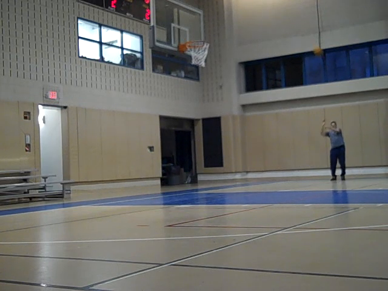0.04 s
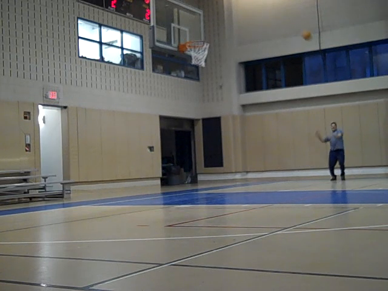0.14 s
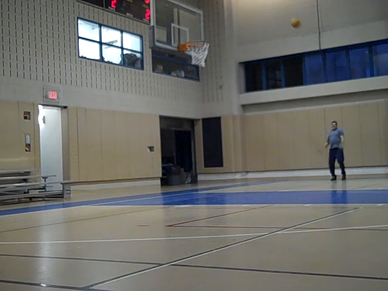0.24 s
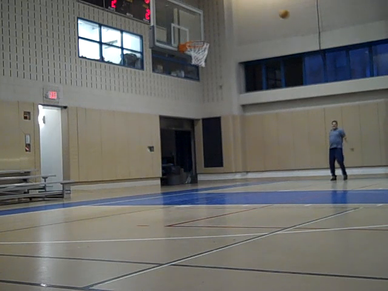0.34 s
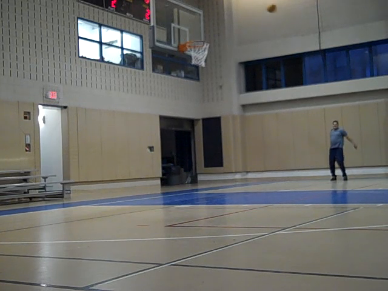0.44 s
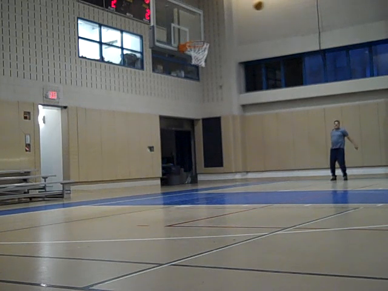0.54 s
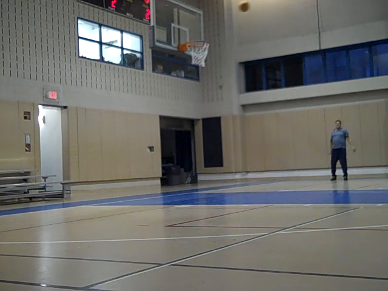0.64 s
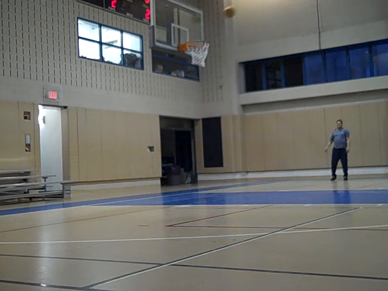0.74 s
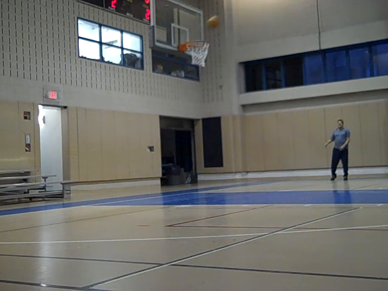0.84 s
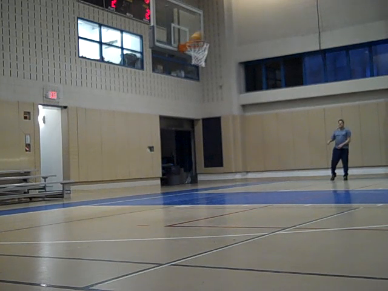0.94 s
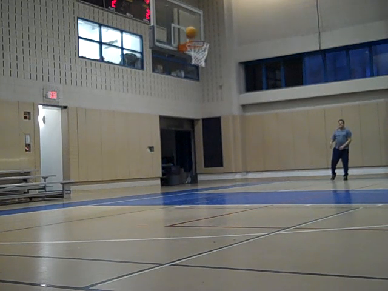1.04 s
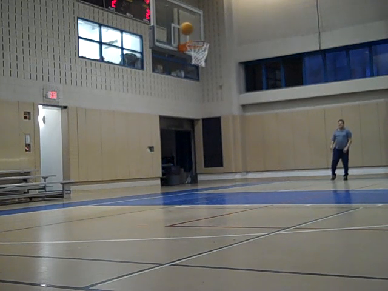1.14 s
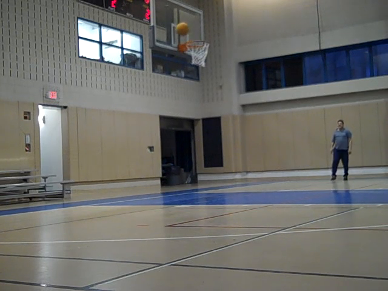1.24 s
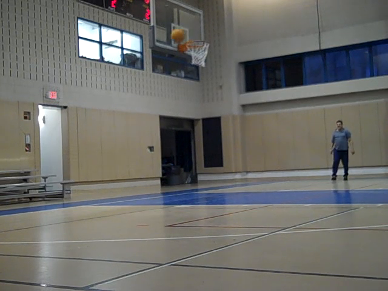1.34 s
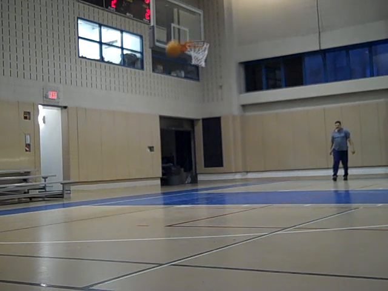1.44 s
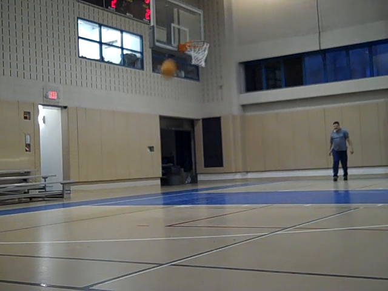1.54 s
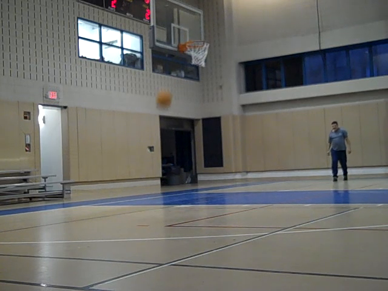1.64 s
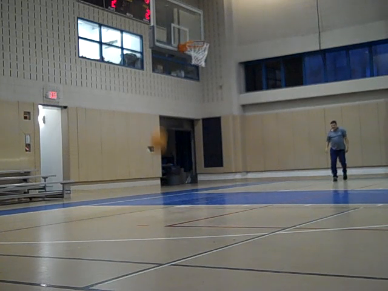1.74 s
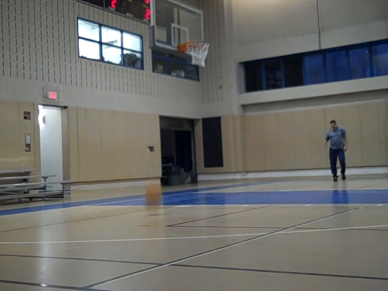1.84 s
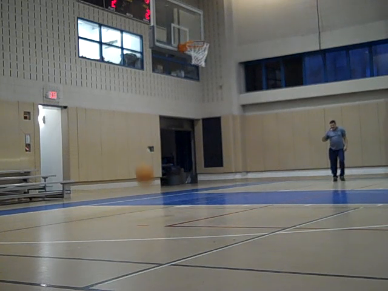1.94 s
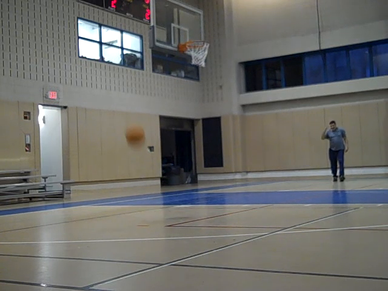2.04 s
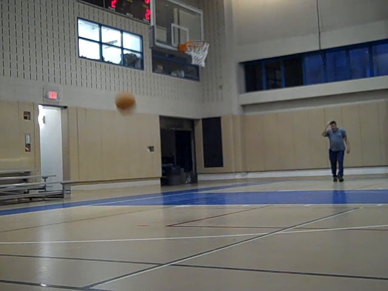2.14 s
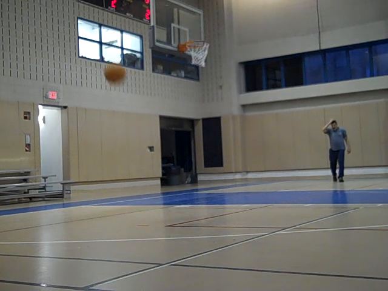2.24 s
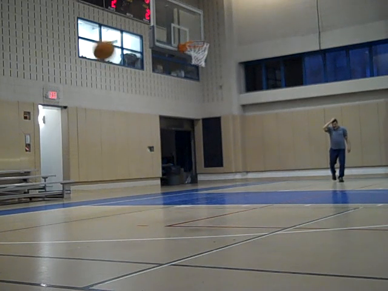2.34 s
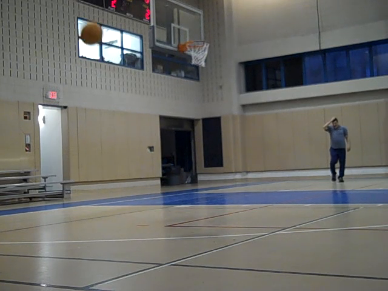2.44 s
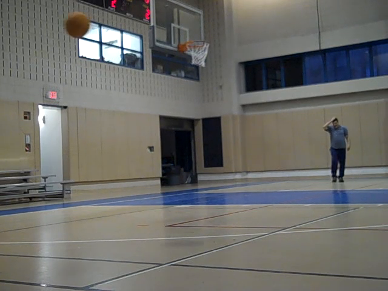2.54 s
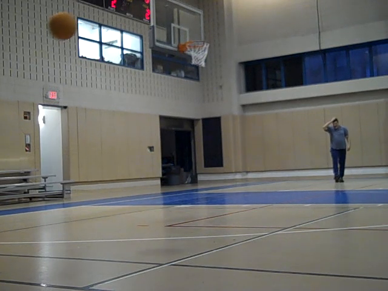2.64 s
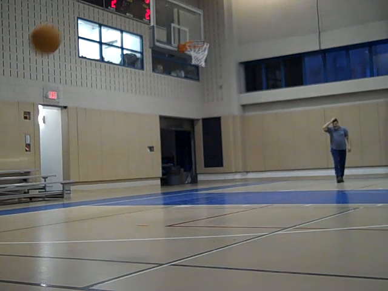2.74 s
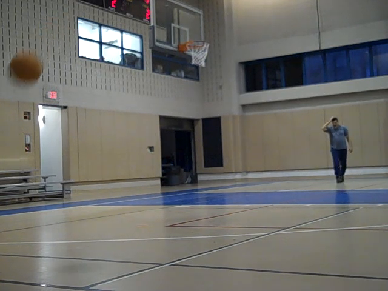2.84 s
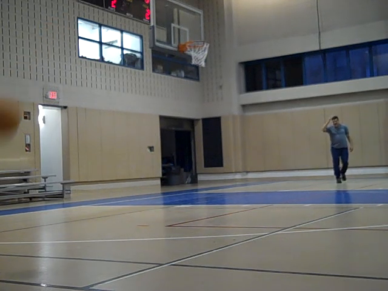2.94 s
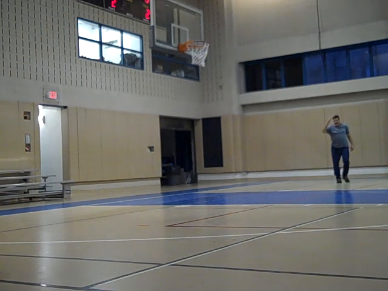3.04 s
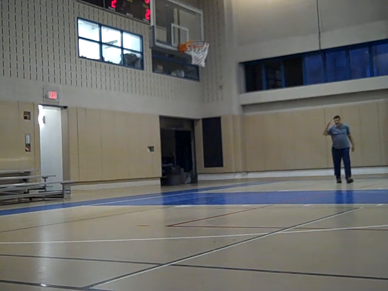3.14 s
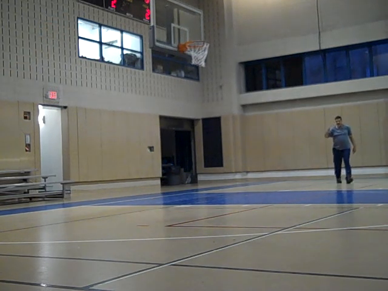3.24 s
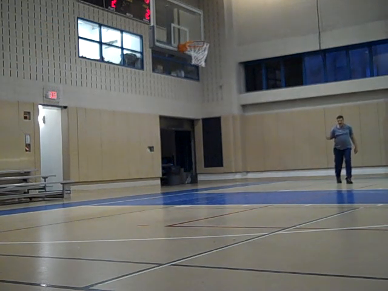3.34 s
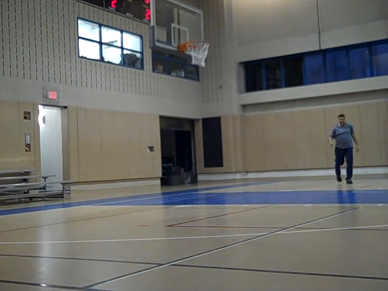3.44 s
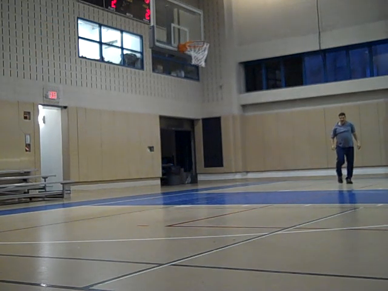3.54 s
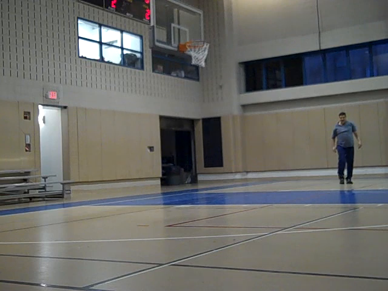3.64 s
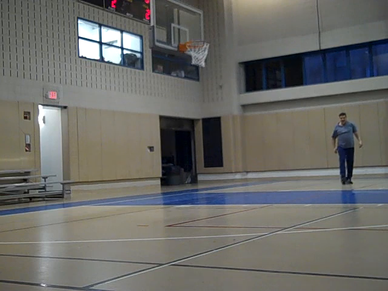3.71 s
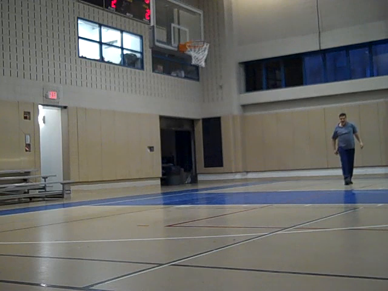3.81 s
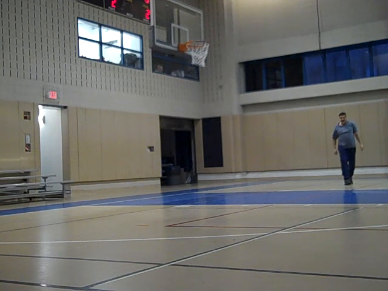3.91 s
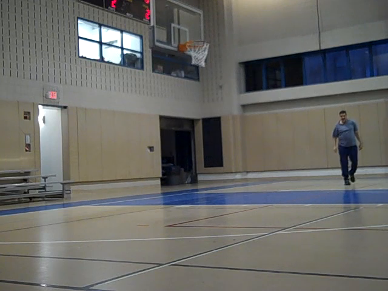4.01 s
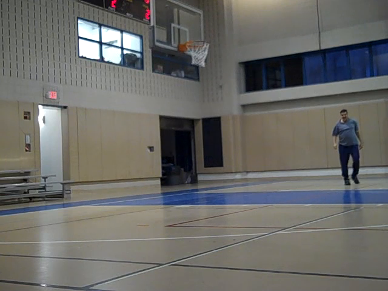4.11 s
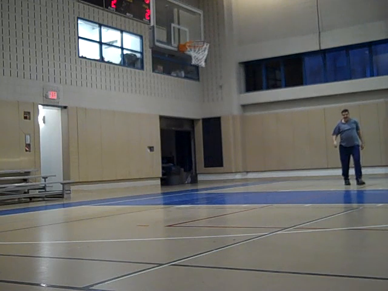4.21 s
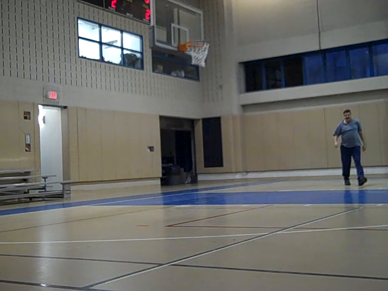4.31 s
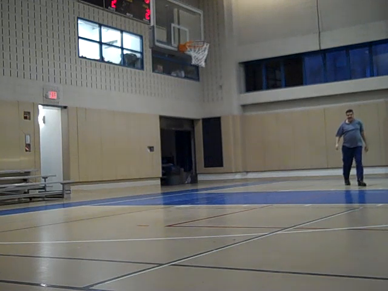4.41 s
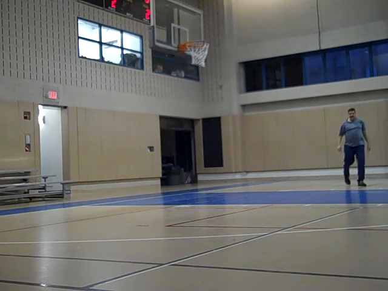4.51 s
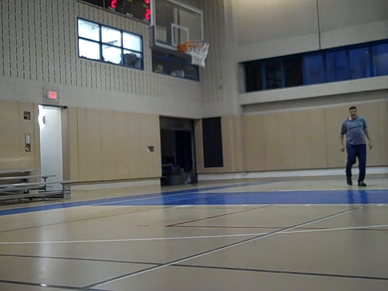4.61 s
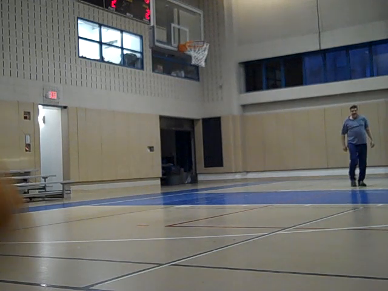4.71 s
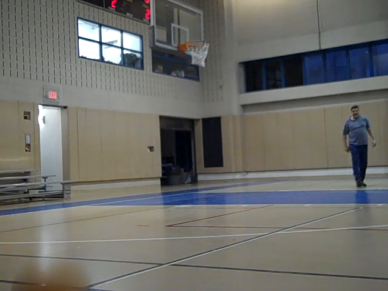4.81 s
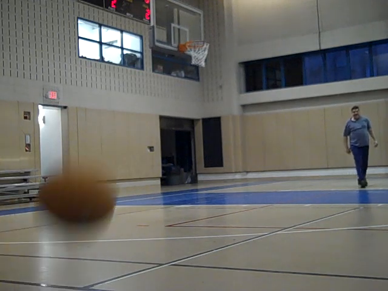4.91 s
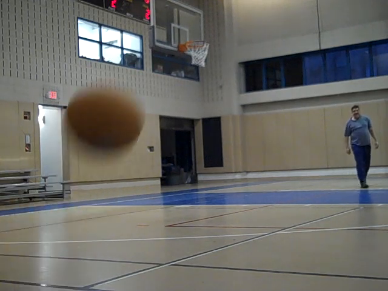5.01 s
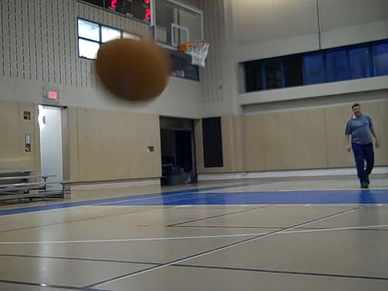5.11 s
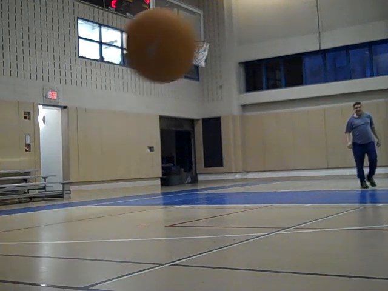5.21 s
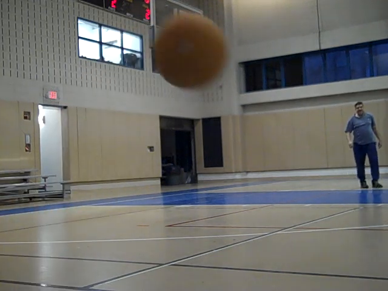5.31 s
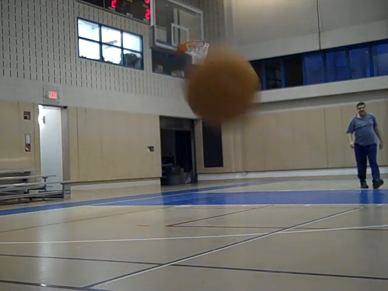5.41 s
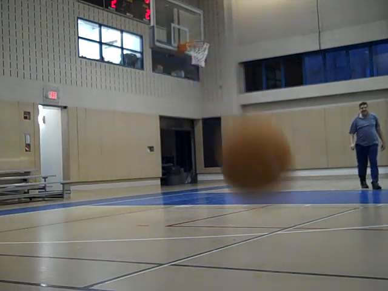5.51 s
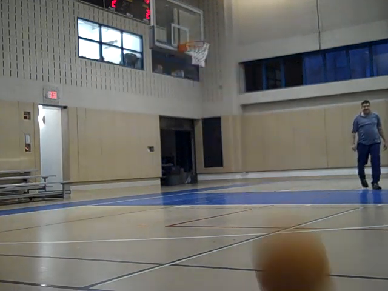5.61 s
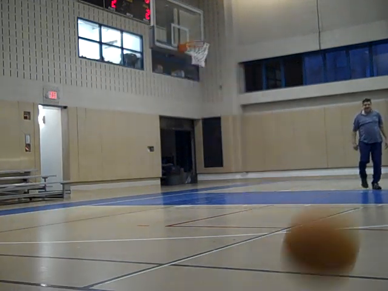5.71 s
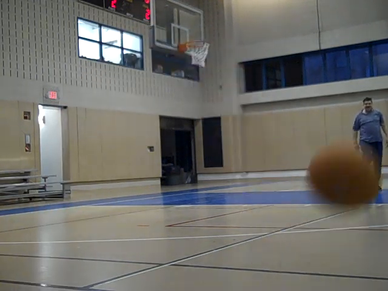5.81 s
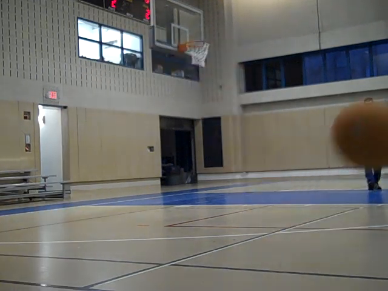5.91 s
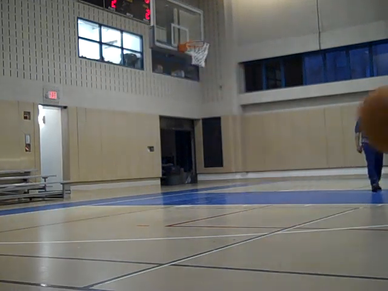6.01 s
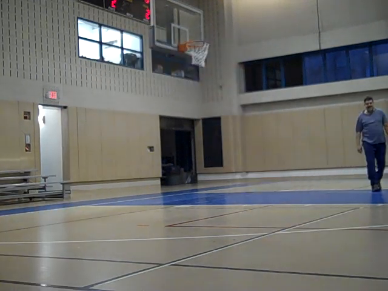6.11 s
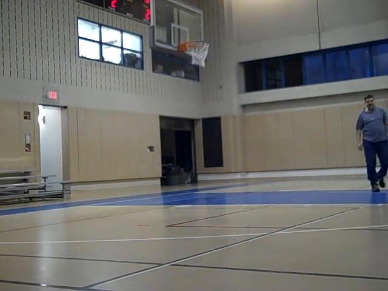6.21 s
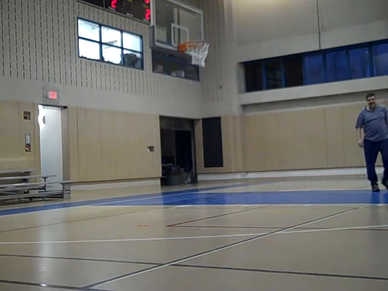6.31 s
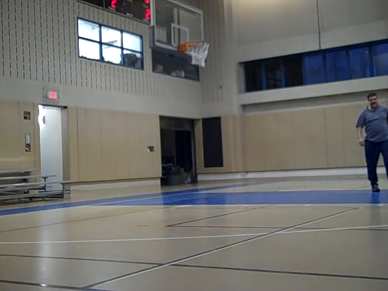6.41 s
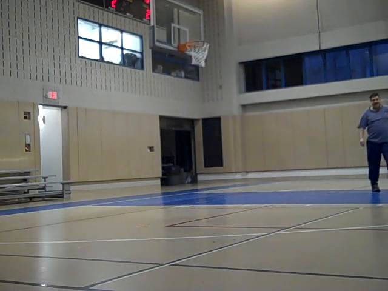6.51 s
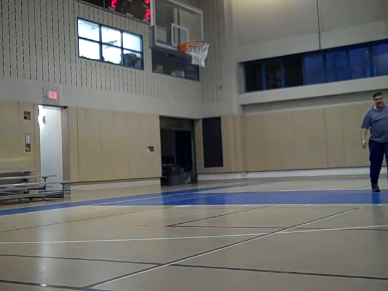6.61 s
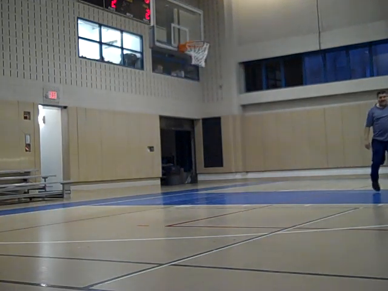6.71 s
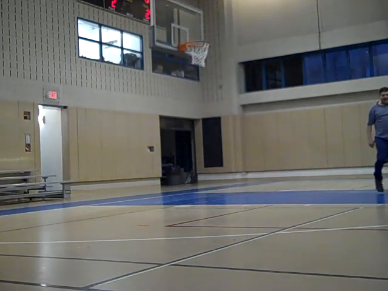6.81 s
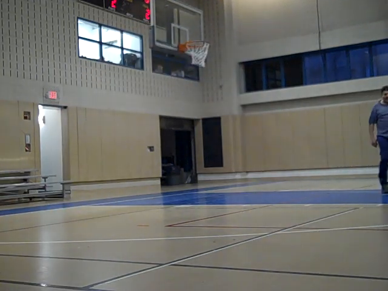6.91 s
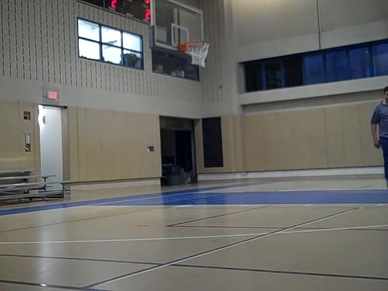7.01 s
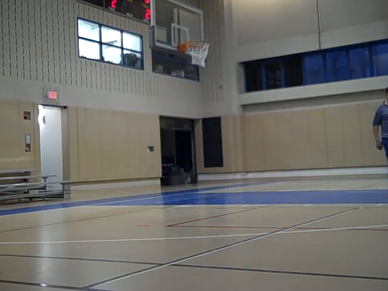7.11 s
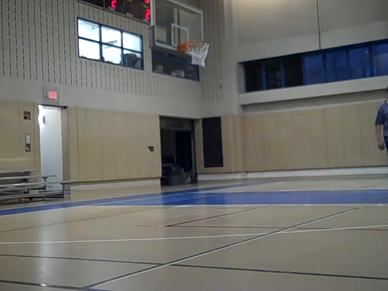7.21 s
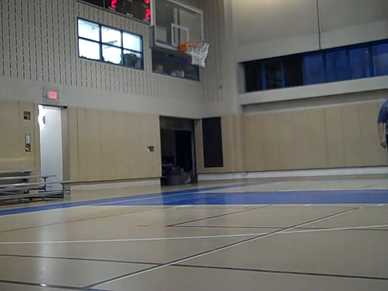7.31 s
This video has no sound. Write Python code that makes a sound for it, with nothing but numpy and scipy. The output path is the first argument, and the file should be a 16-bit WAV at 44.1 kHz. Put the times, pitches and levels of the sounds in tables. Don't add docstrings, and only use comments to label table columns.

```python
import sys
import numpy as np
from scipy import signal
from scipy.fft import rfft, irfft
from scipy.io import wavfile
from scipy.ndimage import uniform_filter1d

SR = 44100
rng = np.random.default_rng(int(sys.argv[2]) if len(sys.argv) > 2 else 0)


def volts_from_db(level):
    exponent = np.asarray(level, float) / 20
    return 10 ** exponent


def store_pcm(level_fs):
    pcm = np.round(np.clip(level_fs, -1, 1) * 32767).astype(np.int16)
    wavfile.write(sys.argv[1], SR, np.atleast_2d(pcm).T)


N = 324135

# [f/Hz, density/dB]
VENT_COLOUR = [(22, -8), (58, -3), (251, -4), (1080, -10.5), (2730, -19), (6710, -26), (15200, -44),
               (16500, -56)]
# [f/Hz, level/dB]
WHINES = [(4802, -93), (6481, -88)]

# [kind of contact, t/s, slap level/dB, ring level/dB, tail level/dB, #
# tail centre f/Hz]
BLOWS = [
    ("hand", 0.0263, -47, -51, -59, 1200),
    ("rim", 1.0086, -36.5, -29, -51.5, 1250),
    ("far floor", 1.932, -11.5, -19.5, -33.5, 956),
    ("floor", 3.1637, -11, -23.5, -41.5, 1340),
    ("stands", 4.0155, -25, -30.5, -40, 630),
    ("floor", 4.849, -12, -21.5, -44, 1750),
    ("floor", 5.7015, -12.5, -24, -48.5, 1630),
    ("floor", 6.4133, -16.5, -28, -51.5, 1420),
    ("floor", 7.024, -18, -34, -52.5, 1440),
]
# [distance/m, side wall detour/m, end wall detour/m, echo level/dB, tail treble/(dB/octave)]
PLACES = [
    (21.5, 10.3, 13.4, -3, -4.5),
    (18, 15.6, 25, -8, .6),
    (16.7, 14.1, 35.3, -4.5, .7),
    (8, 36.8, 69.8, -14.5, 2.2),
    (4, 36, 70, -40, -5.5),
    (2.9, 40.1, 66.9, -22, 1.2),
    (1.85, 43.2, 67, -21, 2.8),
    (1.95, 40.1, 70.9, -20.5, 4.4),
    (2.2, 11.3, 32, -16.5, 3.4),
]
CONTACT = {"hand": (-4, -22, .0018, -2.5, 2), "rim": (-6, -19, 1, 2.2, 3),
           "far floor": (-18, -27, -0.2, 0, 0), "floor": (1, -26.5, .003, .6, 0),
           "stands": (6, -21.5, 0.1, 3, 0)}
REPLY = {"hand": (-2.2, 7, 2.5, .022), "rim": (1.5, -3, -.6, .1), "far floor": (-1.1, 5.5, -2.5, .2),
         "floor": (.1, 4, -4.5, .097), "stands": (3.5, -13.5, -8, .028)}
# [f/Hz, density/dB]
SKIN_COLOUR = [(180, -17), (300, 0.5), (1530, -6), (2030, -2), (7000, -9.5), (8730, -6), (14000, -19.5),
               (16500, -27)]
# [f/Hz, level/dB, t60/s]
BALL_MODES = [(983, -0.5, 0.036), (1196, 4, 0.02), (1470, -1, 0.026), (1858, -5, 0.043), (2348, -11, 0.056),
              (2725, -15, 0.036), (2950, -12.5, 0.07), (3470, -11.5, 0.03), (4270, -28, 0.16)]
# [f/Hz, level/dB, t60/s]
FLOOR_MODES = [(75.6, -0.5, 0.12), (100.3, 7.5, 0.17), (178, -6, 0.04), (300, 4, 0.18)]
# [f/Hz, colour/dB, t60/s]
HALL_BANDS = [(40, -22.5, 1.0), (94, -5.5, 1.96), (378, -3, 1.09), (1000, -2, 1.727), (1960, -4, 1.72),
              (4000, -8.5, 1.02), (9000, -15.5, 0.7), (16000, -38, 0.52)]

# [t/s, level/dB]
LANDING = [
    (.21, -78),
    (.245, -52),
    (.33, -59.5),
    (.42, -58.5),
    (.5, -66),
]
# [t/s, level/dB]
SLIDING = [
    (.3, -74),
    (.42, -63),
    (.6, -59),
    (.75, -63.5),
    (.9, -68),
    (1.0, -69),
]
# [f/Hz, width/Hz, level/dB]
LANDING_PEAKS = [(1300, 900, -9), (1480, 120, -5), (1850, 110, 4), (3880, 450, -19), (5700, 900, -23)]
SLIDING_PEAKS = [(1450, 700, -5), (1980, 260, 0), (2280, 300, -4), (2510, 110, 0), (3800, 500, -20),
                 (4620, 600, -20)]
# [t/s, level/dB,
# centre f/Hz, width/Hz, length/s]
TICKS = [(0.211, -55.5, 796, 200, 0.067), (.24, -60, 1210, 180, 0.061), (0.222, -64.5, 10200, 2500, 0.036),
         (0.483, -64.5, 9000, 8200, 0.045), (1.94, -22.5, 990, 300, 0.0054), (2.67, -66, 9000, 8000, 0.012),
         (2.7542, -67, 5800, 3000, .004), (3.753, -63, 8000, 8000, .005), (3.78, -66, 10000, 6000, 0.0055),
         (3.8423, -62.5, 5000, 5000, 0.0091), (3.876, -56.5, 1500, 1000, 0.022),
         (4.313, -63, 11000, 7000, 0.011), (4.5147, -66, 5000, 4000, .004),
         (5.414, -66.5, 10000, 8000, 0.02), (5.608, -57, 4480, 4000, 0.0021),
         (6.764, -48, 700, 300, 0.0083)]

# [t/s, level/dB, overtone level/dB, length/s]
SQUEAKS = [(1.154, -48, -10, 0.065), (1.2094, -52.5, -3, 0.019), (1.276, -44.5, -5.5, 0.022),
           (1.3294, -65.5, 8.5, 0.02), (1.427, -59, 7, 0.038), (1.467, -56, 0, 0.042),
           (1.5647, -52.5, -3, 0.042), (1.621, -71, 4, 0.037), (1.707, -64.5, -6, 0.04),
           (1.796, -55.5, -3, 0.028), (1.874, -72, -6, 0.034)]
# [multiple of the fundamental, level/dB]
HINGE_OVERTONES = [(2, -10), (3, -10), (4, -32), (5, -22), (6, -25), (7, -27)]

# [f/Hz, level/dB, t60/s]
PLANK_MODES = [(113, -35, 0.28), (211, -6, 0.98), (289, 2.5, 0.86), (340, -6.5, 1.26), (422.6, -4.5, 1.21),
               (502, 5, 0.49), (558, -8, 0.65), (640, 4, 0.31), (770, -26, 0.68), (808, -9.5, 1.25),
               (1030, -10, 1.1), (1210, -13, 0.21), (1290, 0.5, 0.45), (1740, -24, 0.34)]


def level(x, db):
    return x * volts_from_db(db) / np.sqrt(np.mean(x ** 2))


def peak(x, db):
    return x * volts_from_db(db) / np.abs(x).max()


def noise(length):
    return rng.standard_normal(length)


def clock(seconds):
    return np.arange(int(seconds * SR)) / SR


def colour(x, points):
    hz, db = np.transpose(points)[:2]
    f = np.fft.rfftfreq(len(x), 1 / SR) + 1
    gain = volts_from_db(np.interp(np.log(f), np.log(hz), db))
    return irfft(rfft(x) * gain, len(x))


def resonate(x, hz, width, db):
    b, a = signal.iirpeak(hz, hz / width, SR)
    return volts_from_db(db) * signal.lfilter(b, a, x)


def steep(x, hz, width, db):
    return resonate(resonate(x, hz, width, db), hz, width, 0)


def decay(t, t60):
    return 1000. ** (-t / t60)


def ring(modes, seconds):
    t = clock(seconds)
    return sum(volts_from_db(db) * np.sin(2 * np.pi * (hz * t + rng.random())) * decay(t, t60) for hz, db, t60 in modes)


def fader(rows):
    s, db = np.transpose(rows)
    return volts_from_db(np.interp(np.arange(N) / SR, s, db, left=-200, right=-200))


def add(out, x, s):
    i = int(s * SR)
    out[i:i + len(x)] += x[:N - i]


def arrive(t, dip_db, walls_s):
    return volts_from_db(dip_db / (1 + np.exp(np.clip((t - walls_s) / 0.002, -50, 50))))


def hall(strong_hz, db, treble_db, bass_db, boom_db, dip_db, walls_s):
    size = 2 ** 16
    t = np.arange(size) / SR
    octave = np.log2(np.fft.rfftfreq(size, 1 / SR) + 1)
    emphasis_db = 6 * np.exp(-((octave - np.log2(strong_hz)) / .7) ** 2)
    spectrum = rfft(noise(size)) * volts_from_db(emphasis_db)
    clumps = level(uniform_filter1d(noise(size), size=200), 0)
    grain = volts_from_db(3.1 * np.exp(-t / 0.22) * clumps)
    centres = np.log2([row[0] for row in HALL_BANDS])
    tail = np.zeros(size)
    for k, (hz, colour_db, t60) in enumerate(HALL_BANDS):
        only_this = np.arange(len(HALL_BANDS)) == k
        band = irfft(spectrum * np.interp(octave, centres, only_this))
        slope_db = treble_db if hz > 1400 else bass_db
        tilt_db = slope_db * abs(np.log2(hz / 1400)) + boom_db * (hz < 130)
        tail += volts_from_db(db + 10.5 + colour_db + tilt_db) * band * decay(t, t60)
    build_up = 1 - np.exp(-t / 0.0038)
    return tail * grain * arrive(t, dip_db, walls_s) * build_up


def air():
    t = np.arange(N) / SR
    whine = sum(volts_from_db(db) * np.sin(2 * np.pi * hz * t) for hz, db in WHINES)
    vent = level(colour(noise(N), VENT_COLOUR), -65)
    mic_hiss = level(colour(noise(N), [(14500, -2), (16500, -8)]), -79.0)
    return vent + whine + mic_hiss


def slap(rub, skin, slap_s):
    t = np.arange(len(rub)) / SR
    flatten = np.exp(-(t / max(slap_s, .0038)) ** 4 - t / .01)
    spectrum = rfft(noise(len(t)) * flatten)
    even = spectrum / np.sqrt(uniform_filter1d(np.abs(spectrum) ** 2, size=200))
    crackle = colour(irfft(even, len(t)), skin)
    sharp_start = 1 + 0.99 * np.exp(-t / 0.00089)
    return peak(crackle * np.sqrt(flatten) * sharp_start, 0) + peak(rub * np.exp(-t / .014), -18)


def lift_off(rub):
    t = np.arange(len(rub)) / SR
    contact_s = .0125
    tug = np.exp(-((t - contact_s) / 0.0016) ** 2) * level(rub, -9)
    again = ring(BALL_MODES, .25) * np.exp(-t / 0.018) * (1 - np.exp(-t / 0.00032))
    late = int((contact_s - .0015) * SR)
    tug[late:] += again[:len(t) - late]
    return tug


def blow(slap_db, ring_db, lift_db, thud_db, slap_s, tilt_db):
    t = clock(.25)
    skin = [(hz, db + tilt_db * np.log2(hz / 2000)) for hz, db in SKIN_COLOUR]
    rub = colour(noise(len(t)), skin)
    strike = peak(slap(rub, skin, slap_s), slap_db)
    strike += peak(ring(BALL_MODES, .25), ring_db)
    strike += peak(ring(FLOOR_MODES, .25), thud_db)
    soft_start = 1 - np.exp(-t / 0.000082)
    return soft_start * strike + peak(lift_off(rub), lift_db)


def echoes(height_m, distance_m, side_m, end_m, db):
    ceiling_m = 9.4
    trips = np.arange(1, 5)
    path_m = np.hypot(distance_m, 2 * trips * ceiling_m - height_m)
    flutter_m = path_m - np.hypot(distance_m, height_m)
    flutter_db = db - 5 * (trips - 1)
    return [*zip(flutter_m, flutter_db), (side_m, db - 3), (end_m, db - 7.5)]


def ball():
    sound_m_s, dull_per_m = 343, 0.0068
    out = np.zeros(N)
    for event, place in zip(BLOWS, PLACES):
        kind, s, slap_db, ring_db, tail_db, tail_hz = event
        distance_m, side_m, end_m, echo_db, treble_db = place
        lift_db, thud_db, slap_s, tilt_db, height_m = CONTACT[kind]
        sound = blow(slap_db, ring_db, ring_db + lift_db, slap_db + thud_db, slap_s, tilt_db)
        add(out, sound, s)
        add(out, hall(tail_hz, tail_db, treble_db, *REPLY[kind]), s)
        for detour_m, db in echoes(height_m, distance_m, side_m, end_m, echo_db):
            dull = np.clip(dull_per_m * (distance_m + detour_m), 0, .95)
            echo = signal.lfilter([1 - dull], [1, -dull], sound)
            add(out, volts_from_db(db) * echo, s + detour_m / sound_m_s)
    return out


def shoes():
    out = np.zeros(N)
    for rows, peaks in ((LANDING, LANDING_PEAKS), (SLIDING, SLIDING_PEAKS)):
        rubber = sum(steep(noise(N), hz, width, db) for hz, width, db in peaks)
        out += fader(rows) * level(rubber, 0)
    for s, db, hz, width, length in TICKS:
        t = clock(4 * length)
        grit = level(steep(noise(len(t)), hz, width, 0), db)
        add(out, grit * np.exp(-t / length) * (1 - np.exp(-5 * t / length)), s)
    return out


def hoop():
    hinge_hz, split_hz = 1899, 35
    direct = np.zeros(N)
    for s, db, over_db, length in SQUEAKS:
        t = clock(3 * length)
        phase = 2 * np.pi * hinge_hz * t + 0.019 * np.cumsum(noise(len(t)))
        beat = np.cos(2 * np.pi * split_hz * (t + s) + 0.026 * np.cumsum(noise(len(t))))
        tone = beat * np.sin(phase)
        tone += sum(volts_from_db(part_db + over_db) * np.sin(k * phase) for k, part_db in HINGE_OVERTONES)
        swell = (1 - np.exp(-t / 0.0013)) * np.exp(-(t / length) ** 2)
        add(direct, volts_from_db(db) * tone * swell, s)
    tail = hall(1800, -47, treble_db=4.0, bass_db=0, boom_db=0, dip_db=0, walls_s=.05)
    return direct + signal.fftconvolve(direct, tail)[:N]


def stands():
    t = clock(1)
    shake = noise(SR)
    loose = sum(resonate(shake, hz, 40, db) * decay(t, t60) for hz, db, t60 in PLANK_MODES)
    planks = volts_from_db(8) * ring(PLANK_MODES, 1) + volts_from_db(23) * loose
    planks *= arrive(t, -13, .07) * (1 - np.exp(-t / 0.0032))
    metal = [(60, -37), (250, -14), (900, -1), (2500, -7), (6000, -16.5), (16000, -41)]  # (Hz, dB)
    rattle = colour(noise(SR), metal) * np.exp(-(t / 0.048) ** 2)
    out = np.zeros(N)
    add(out, volts_from_db(-43) * planks + peak(rattle, -23.5), 4.016)
    return out


def scene():
    return (air() + ball() + shoes() + hoop() + stands())[None]


def band_limit(x):
    return signal.sosfilt(signal.butter(12, 16870, fs=SR, output="sos"), x)


def record(dry):
    top_cut = signal.ellip(12, .2, 100, 16600, fs=SR, output="sos")
    mix = signal.sosfilt(top_cut, dry) - .0004
    return band_limit(mix)


dry = scene()
out = record(dry)
store_pcm(out)
```